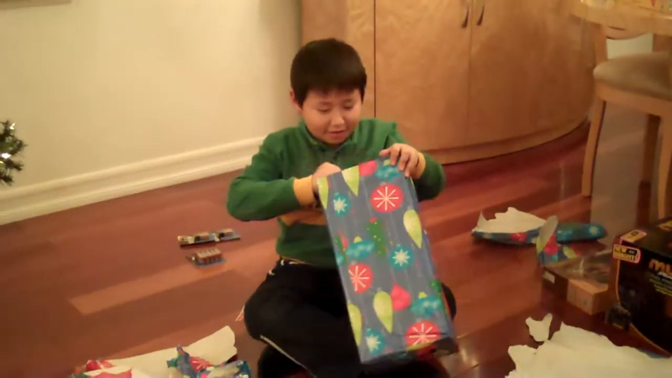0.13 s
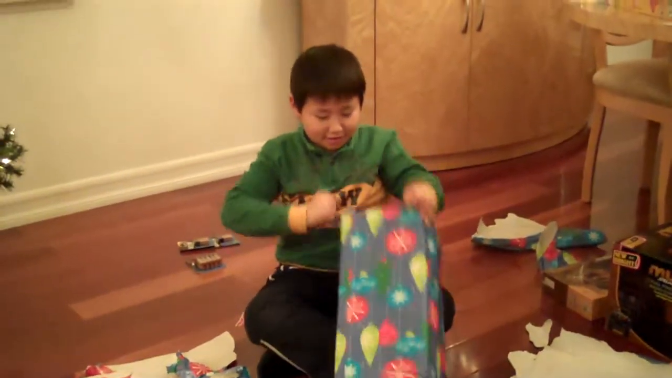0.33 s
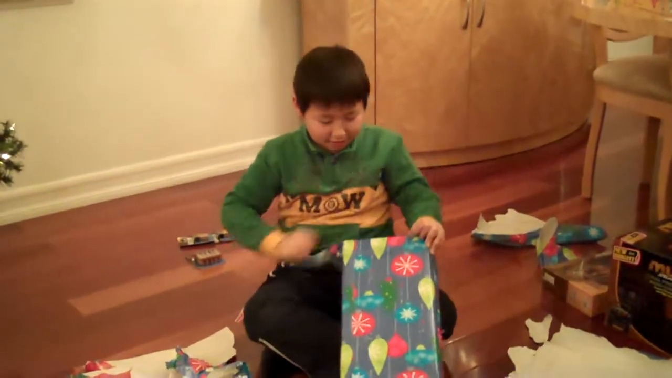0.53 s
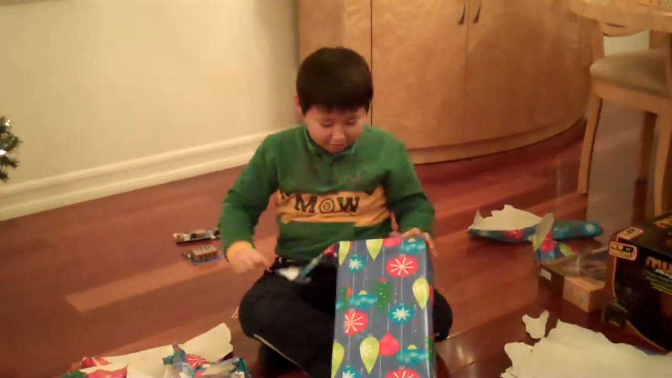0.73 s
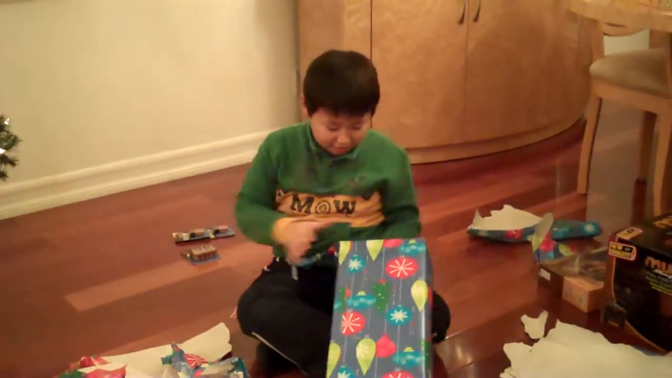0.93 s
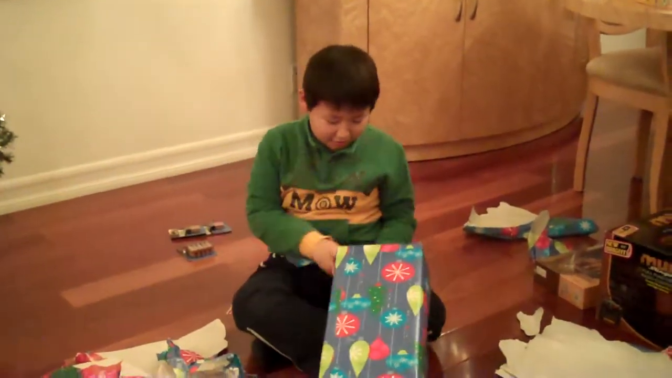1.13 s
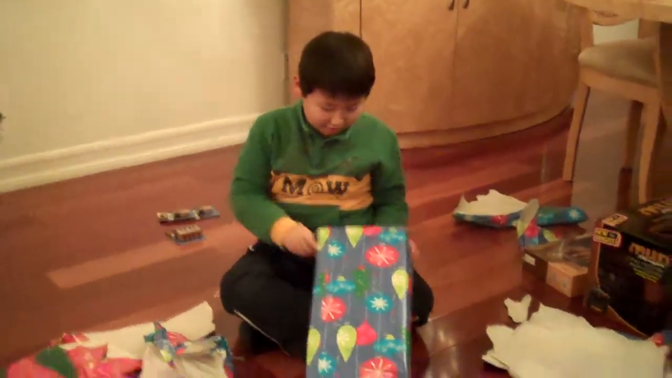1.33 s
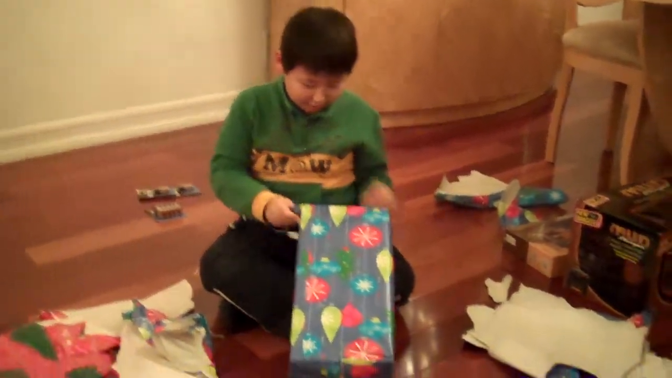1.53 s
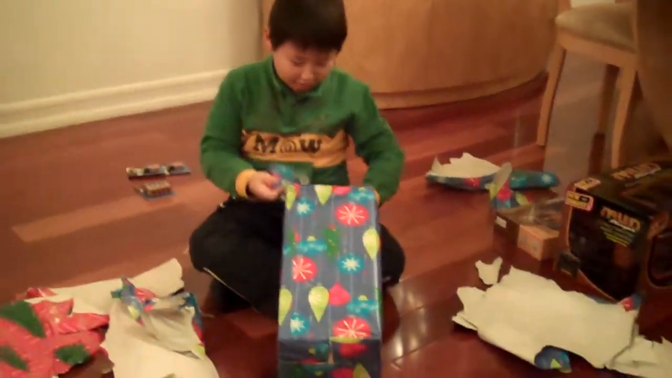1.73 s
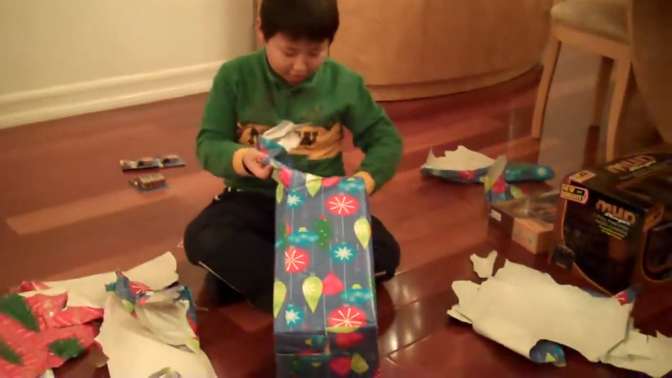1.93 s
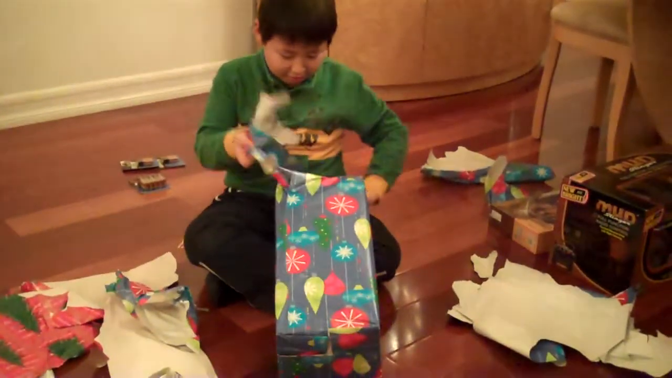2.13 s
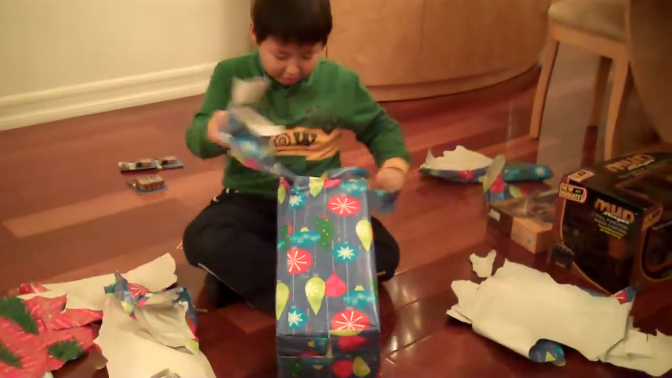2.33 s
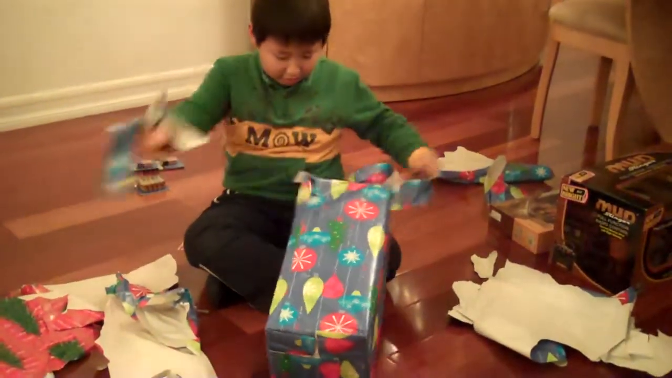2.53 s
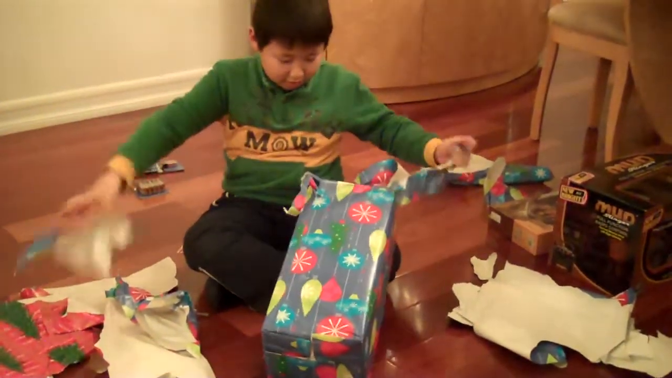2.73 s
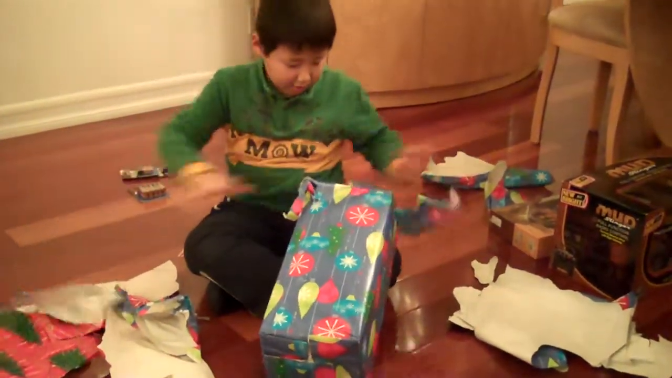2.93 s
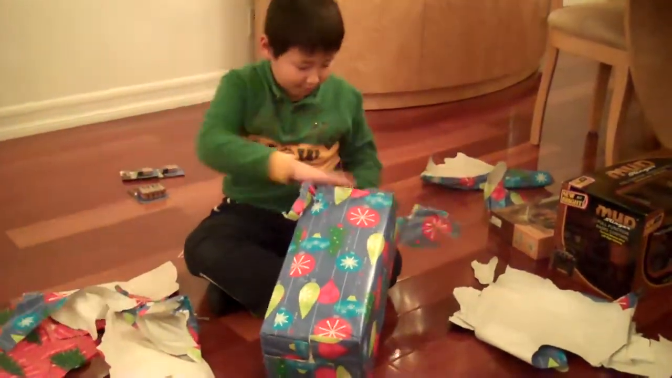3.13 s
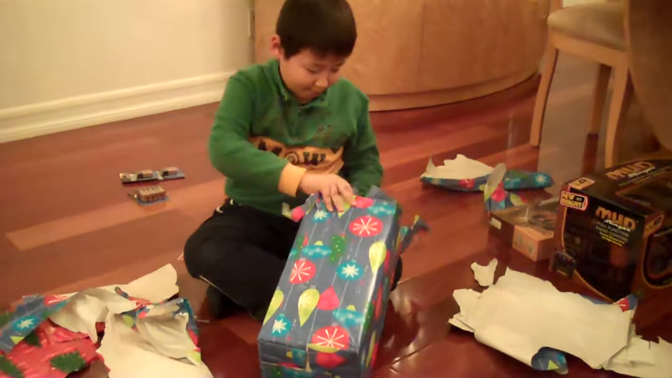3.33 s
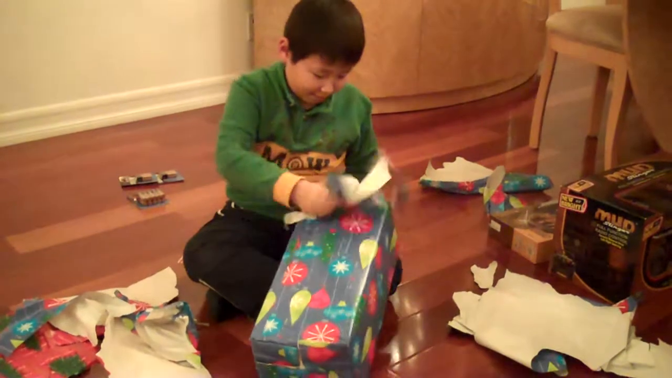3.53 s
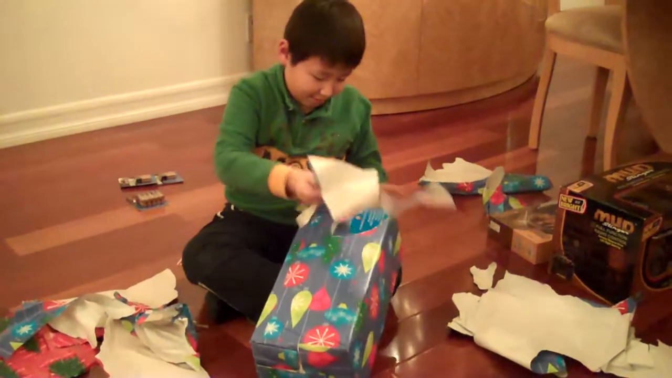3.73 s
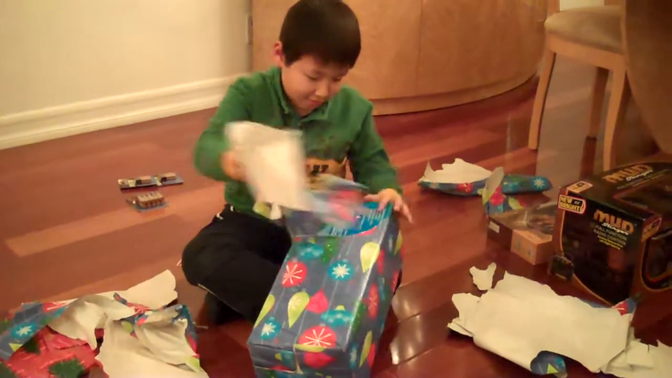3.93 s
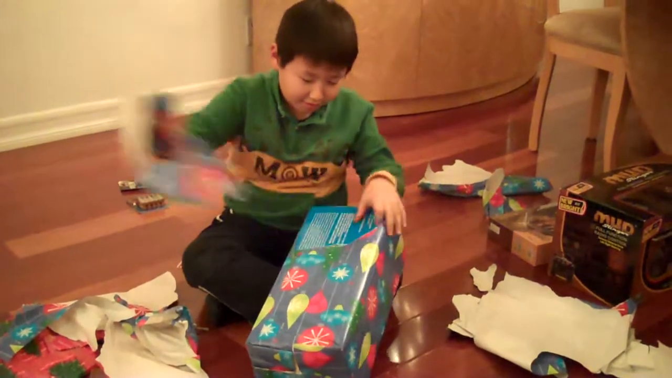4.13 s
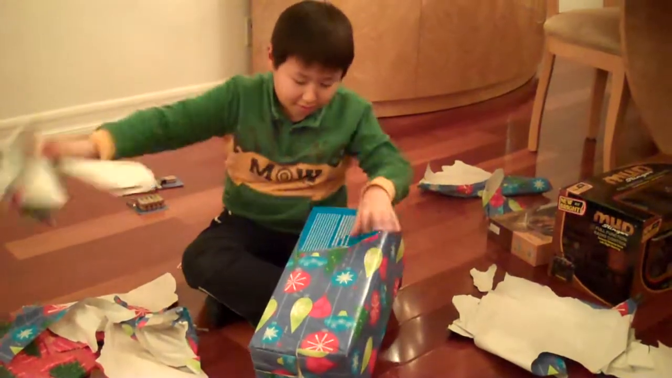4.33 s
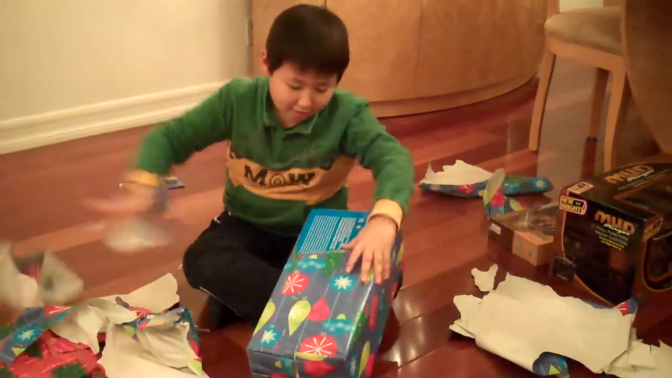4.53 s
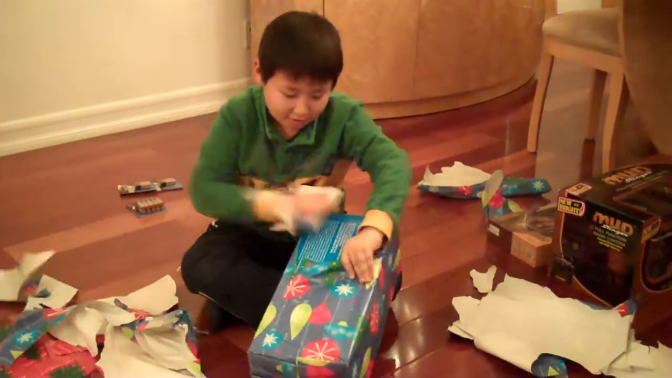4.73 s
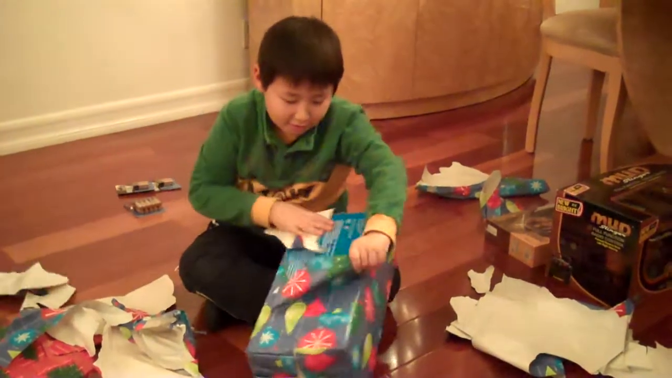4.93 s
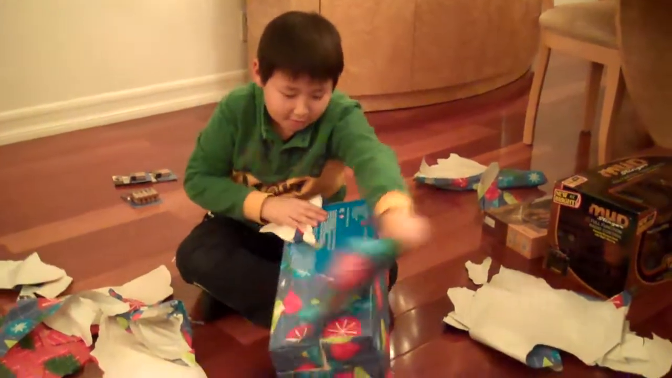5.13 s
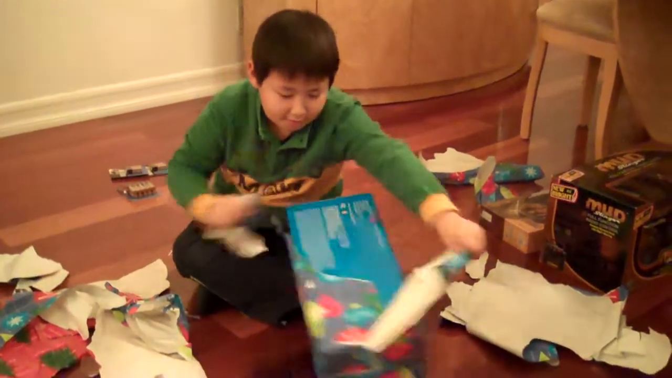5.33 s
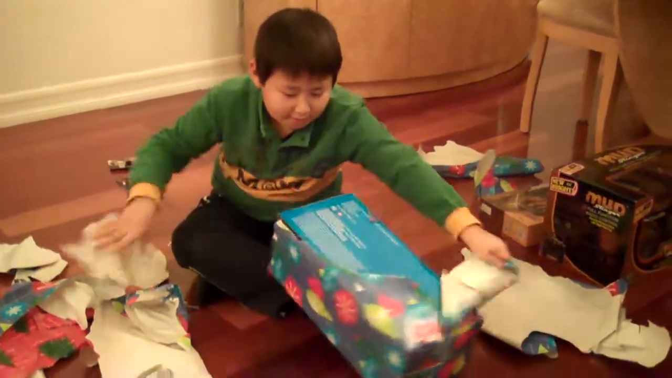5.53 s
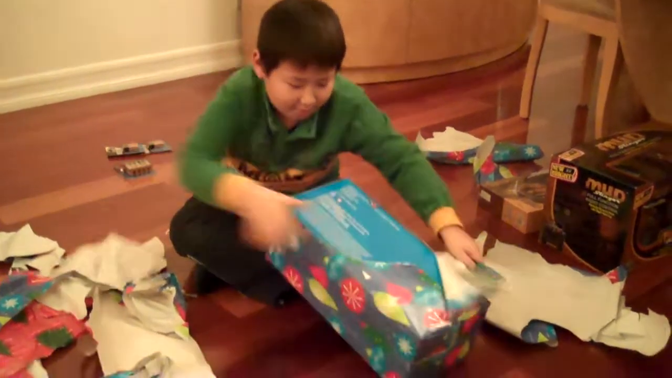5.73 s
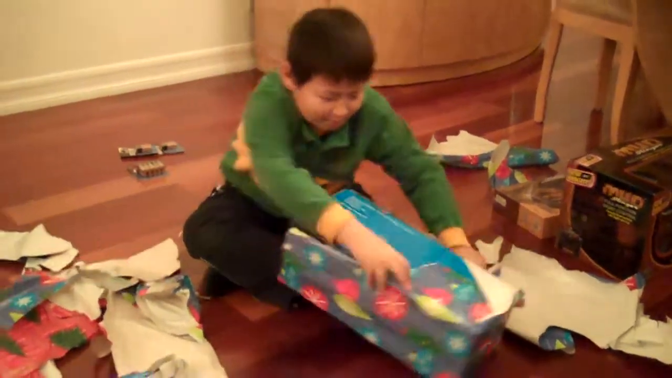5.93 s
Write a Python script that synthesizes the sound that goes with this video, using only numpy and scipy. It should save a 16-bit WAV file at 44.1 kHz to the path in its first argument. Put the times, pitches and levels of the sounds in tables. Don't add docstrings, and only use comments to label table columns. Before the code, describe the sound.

Hands tear thin gift wrap off a cardboard box in crisp, uneven rips, with sharp paper crackles and dull box knocks in a hard-floored room.

```python
import sys
import numpy as np
from scipy import signal
from scipy.fft import rfft, irfft, next_fast_len
from scipy.io import wavfile
from scipy.ndimage import uniform_filter1d, map_coordinates

SR = 44100
rng = np.random.default_rng(int(sys.argv[2]) if len(sys.argv) > 2 else 0)


def unload_wav(signal):
    wavfile.write(
        sys.argv[1],
        SR,
        np.round(np.clip(np.atleast_2d(signal).T, -1, 1) * 32767).astype(np.int16),
    )


def invert_db(level):
    return 10 ** (np.asarray(level, dtype=float) / 20)


N = 268657

# t/s, level/dB, slack (extra flap)/dB
SHEET_RUSTLE = [(0, -23.5, -2.5), (.14, -33.5, -0.5), (.5, -27, 2.5), (.86, -45.5, -9.5), (1.04, -42, -3.5),
                (1.2, -32, 5), (1.6, -26.5, -3.5), (2.2, -30.5, -0.5), (2.72, -28, 1.5), (3.06, -50, -5.5),
                (3.1, -37, 2), (3.4, -33.5, 2.5), (3.7, -20.5, 1.5), (4.03, -34, -2), (4.5, -38, 1.5),
                (4.9, -24.5, 0.5), (5.3, -34, 2), (5.84, -33.5, -1)]
# t/s, peak level/dB, struck spot f/Hz, level of the slide after it/dB
BOX_KNOCKS = [(0.308, -33, 790, -29.5), (0.458, -24.5, 220, -33), (0.607, -21, 915, -34.5),
              (1.089, -37, 980, -39), (1.721, -25, 308, -38), (1.956, -34, 960, -41),
              (2.875, -34, 250, -41.5), (3.177, -38.5, 460, -37.5), (4.574, -48, 570, -33),
              (4.8, -21.5, 180, -37), (5.406, -20.5, 300, -28.5), (5.49, -26, 450, -35),
              (5.922, -27.5, 494, -34), (5.985, -12, 800, -32)]
# f/Hz, level per Hz/dB
FIBRE_SPECTRUM = [(500, -36), (1500, -11), (2100, -1), (3300, 1.5), (5000, 4), (8000, -1), (11000, -3.5),
                  (15000, 0)]
# f/Hz, level per Hz/dB
SHEET_SPECTRUM = [(150, -30.5), (500, -9.5), (1000, -5), (2200, -3.5), (3500, -6), (7000, -24)]


def unit(x):
    return x / np.sqrt(np.mean(x ** 2) + 1e-20)


def along(points, hz):
    f, v = np.transpose(points)
    return np.interp(np.log(hz + 1), np.log(f + 1), v)


def curves(rows):
    s, *columns = np.transpose(rows)
    return [np.interp(np.arange(N) / SR, s, column) for column in columns]


def wobble(rate):
    knots = rng.standard_normal(int(N * rate / SR) + 4)
    return map_coordinates(knots, [np.arange(N) * rate / SR])


def filtered(x, response):
    size = next_fast_len(N + SR // 2)
    hz = np.fft.rfftfreq(size, 1 / SR)
    return irfft(rfft(x, size) * response(hz), size)[..., :N]


def causal(spectrum):
    def response(hz):
        cepstrum = irfft(np.log(invert_db(along(spectrum, hz))))
        half = len(cepstrum) // 2
        cepstrum[1:half] *= 2
        cepstrum[half + 1:] = 0
        return np.exp(rfft(cepstrum))
    return response


def paired(pair):
    # f/Hz, likeness (0 to 1)
    likeness = [(60, 0.088), (130, 0.84), (300, 0.97), (1400, 0.75), (3000, 0.29), (7000, 0.017),
                (14000, .05)]

    def mid_side(hz):
        angle = np.arccos(np.clip(along(likeness, hz), -1, 1)) / 2
        return np.array([np.cos(angle), np.sin(angle)])
    mid, side = filtered(pair, mid_side)
    return np.array([mid + side, mid - side])


def crackle(rate, spread_db, clump_db, channels=1):
    size_db = spread_db * np.minimum(rng.exponential(1, N), 4.5)
    size_db = size_db + clump_db * (0.83 * wobble(45) + wobble(220))
    polarity = rng.choice([-1, 1], (channels, N))
    return unit((rng.random(N) < rate / SR) * polarity * invert_db(size_db))


def air():
    # f/Hz, level per Hz/dB
    hush_spectrum = [(25, -20), (80, -3), (160, -16), (300, 0), (1200, -11.5), (4000, -1), (8000, -16),
                     (14000, -25)]
    hush = filtered(rng.standard_normal((2, N)), lambda hz: invert_db(along(hush_spectrum, hz)))
    return invert_db(-51.5 + wobble(2.3)) * unit(paired(hush))


def effort_db():
    # full force t/s, build-up/s, hold/s, tearing level/dB
    pulls = [(-0.002, 0.094, 0.094, -30), (0.44, 0.035, 0.0087, -28.5), (0.601, .08, 0.021, -18),
             (.96, .012, 0.0067, -34.5), (1.086, 0.037, 0.0084, -21), (1.243, 0.022, 0.067, -22),
             (1.388, 0.011, 0.019, -13), (1.705, 0.13, 0.14, -16.5), (1.955, 0.14, 0.062, -19),
             (2.127, 0.17, 0.036, -12.5), (2.503, 0.07, 0.047, -26.5), (2.644, 0.03, 0.017, -17.5),
             (3.172, 0.088, 0.092, -28), (3.441, 0.018, 0.046, -18), (3.49, 0.023, 0.046, -13),
             (3.626, 0.28, 0.059, -12.5), (3.785, .03, 0.071, -17.5), (3.87, 0.066, 0.04, -16.5),
             (4.576, 0.0056, 0.0072, -19), (4.644, 0.018, 0.03, -22), (4.799, 0.028, 0.063, -11.5),
             (5.031, 0.19, 0.051, -13.5), (5.142, 0.068, 0.019, -15.5), (5.272, 0.047, 0.012, -26.5),
             (5.403, 0.011, .005, -31), (5.977, .04, 0.0071, -16.5)]
    # full force t/s, build-up/s, hold/s, tearing level/dB
    rip_offs = [
        (.315, 0.19, 0.02, -13),
        (2.27, 0.13, 0.087, -16),
        (3.945, .05, 0.069, -15.5),
        (4.448, 0.0051, .012, -26.5),
        (5.878, .006, 0.026, -18),
        (3.085, .004, .01, -40),
        (5.53, 0.076, 0.014, -26),
    ]
    build_db = 26.5
    let_go_db_per_s, free_db_per_s = 272, 1200
    t = np.arange(0, N, 32) / SR
    power = invert_db(curves(SHEET_RUSTLE)[0][::32]) ** 2
    for rows, fall_db_per_s in ((pulls, let_go_db_per_s), (rip_offs, free_db_per_s)):
        for s, build, hold, db in rows:
            climb = build_db * np.maximum(s - t, 0) / build
            fall = fall_db_per_s * np.maximum(t - s - hold, 0)
            power = power + invert_db(db - climb - fall) ** 2
    return np.interp(np.arange(N) / SR, t, 10 * np.log10(power))


def shifting(x, depth_db):
    z = signal.stft(x, nperseg=256)[2]
    field = rng.standard_normal(z.shape[-2:])
    field = uniform_filter1d(field, size=7, axis=0)
    field = uniform_filter1d(field, size=16, axis=1)
    return signal.istft(z * invert_db(depth_db * unit(field)), nperseg=256)[1][..., :N]


def tearing():
    tear_db = effort_db()
    slack_db = curves(SHEET_RUSTLE)[1]
    flap_db = -9 - 0.39 * (tear_db + 31.5) + slack_db
    spiky_db = -2.5 + 0.3 * (tear_db + 25.5)
    fibres = crackle(7000, spread_db=3.0, clump_db=2.0, channels=3)
    fizz = 0.58 * paired(fibres[1:]) + 0.81 * fibres[0]
    spikes = crackle(460, spread_db=-0.5, clump_db=-3.5) * invert_db(spiky_db - 17.0)
    flap = crackle(4000, spread_db=1.5, clump_db=3.5)
    high = filtered(shifting(fizz + spikes, depth_db=1.52), causal(FIBRE_SPECTRUM))
    low = filtered(flap, causal(SHEET_SPECTRUM))
    return unit(high) * invert_db(tear_db - 6.0) + unit(low) * invert_db(tear_db + flap_db - 1.5)


def handling_db():
    slide_db_per_s = 91
    t = np.arange(N) / SR
    pull_db = uniform_filter1d(effort_db(), size=4000)
    power = invert_db(-49.5 + 0.67 * (pull_db + 30.5)) ** 2
    for s, _, _, db in BOX_KNOCKS:
        power = power + (t > s) * invert_db(db - slide_db_per_s * np.abs(t - s)) ** 2
    return 10 * np.log10(power)


def panels(hz):
    # f/Hz, width/Hz, level/dB
    modes = [
        (98, 67, -5),
        (220, 71, 3),
        (501, 188, 3),
        (970, 700, -5.5),
    ]
    total = 0
    for k, (centre, width, db) in enumerate(modes):
        mode = 1j * hz * width / (centre * centre - hz * hz + 1j * hz * width)
        total = total + (-1) ** k * invert_db(db) * mode
    return total


def box():
    rub = filtered(crackle(900, spread_db=-0.5, clump_db=-1)[0], panels)
    rub = unit(rub) * invert_db(handling_db() - 5)
    pushes, spots = np.zeros(N + SR), np.zeros(N + SR)
    t = np.arange(SR // 8) / SR
    rise = 1 - np.exp(-(t / 0.0028) ** 2)
    for s, db, hz, _ in BOX_KNOCKS:
        noise = rng.standard_normal(len(t))
        start = round(s * SR)
        push = invert_db(db + 10.5 - 60 * t / 0.054) * rise * noise
        spot = invert_db(db + 5 - 60 * t / 0.019) * rise * np.sin(2 * np.pi * hz * t)
        pushes[start:start + len(t)] += push
        spots[start:start + len(t)] += spot
    return rub + filtered(pushes[:N], panels) + spots[:N]


def grip():
    rumble = filtered(rng.standard_normal(N), lambda hz: hz / (20 + hz) / (1 + (hz / 55) ** 4))
    level_db = -62 + 0.26 * (handling_db() + 45) + 3 * wobble(4.05)
    return invert_db(level_db) * unit(rumble) * np.array([[1], [-.8]])


def creases(count=60):
    # t/s, peak level/dB, ring f/Hz, flap level re peak/dB
    rip_snaps = [(0.042, -17, 4420, -25), (0.2507, -2, 5000, -21), (0.312, -0.5, 6800, -25),
                 (1.0844, -16, 6950, -25), (1.243, -17, 6650, -25), (1.3014, -13, 6660, -25),
                 (1.3728, -8, 5060, -22), (1.3908, -0.5, 5140, -22), (1.7146, -7, 6520, -25),
                 (1.7404, -11, 6790, -25), (2.0113, -19, 6690, -25), (2.2633, -2, 4870, -27),
                 (2.3004, -6, 6610, -25), (2.3225, -10, 6700, -25), (2.361, -5.5, 7000, -19),
                 (2.5222, -10.5, 6930, -25), (2.6418, -11, 6330, -25), (3.4395, -3.5, 6910, -29),
                 (3.486, 1, 6340, -25), (3.77, -8, 6660, -29), (4.5761, -5, 5530, -25),
                 (4.6446, -7, 7040, -22), (4.653, 3, 5760, -19), (4.786, -3.5, 6790, -25),
                 (5.1445, -4, 6950, -25), (5.4051, -11.5, 6980, -25), (5.8763, -6, 5700, -23),
                 (5.89, 2, 4700, -27), (5.9787, -11, 7000, -25), (5.9833, -0.5, 6830, -30)]
    # t/s, peak level/dB, ring f/Hz, after-burst level/dB
    slack_snaps = [(0.1624, -13, 6440, -11), (0.199, -18, 5610, -12), (0.218, -13.5, 6370, -9.5),
                   (0.5536, -9, 6200, -10.5), (0.7527, -16, 6400, -9), (0.9148, -34, 4460, -12),
                   (2.794, -5, 6660, -12), (3.084, -20, 4300, -12), (3.0982, -15.5, 4580, -13),
                   (3.139, -20, 6490, -12), (3.1673, -20, 5840, -11), (3.189, -9.5, 6130, -10.5),
                   (3.2274, -3.5, 5980, -10.5), (3.245, 2.5, 4400, -12.5), (3.2602, -9, 6330, -13),
                   (3.2782, -6.5, 6400, -9.5), (3.382, -10.5, 6400, -12), (4.2767, 0.5, 3020, -9.5),
                   (4.4503, -10, 4830, -9.5), (4.5417, -18, 6300, -10), (4.5484, -12.5, 5640, -11),
                   (4.6832, -6, 5540, -11), (4.7208, -8.5, 6530, -9.5), (4.7489, 4.5, 2430, -11.5),
                   (5.4909, -12, 6500, -11), (5.5067, 0, 4360, -12), (5.6441, -5.5, 5000, -12),
                   (5.7763, -6, 4090, -12), (5.7983, -5, 2950, -11.5), (6.0028, -6, 4760, -15)]
    after_db, trim_db = -10.5, -5
    slack_flap_db, small_flap_db = -48, -52
    when = rng.random(count) * (N - 1)
    size = rng.standard_normal((count, 2))
    level_db = effort_db()[when.astype(int)] + 6.5 + 3 * size[:, 0]
    rows = [(s, db + trim_db, hz, slack_flap_db, burst_db) for s, db, hz, burst_db in slack_snaps]
    rows += [(s, db + trim_db, hz, flap_db, after_db) for s, db, hz, flap_db in rip_snaps]
    for n, db, u in zip(when, level_db, size[:, 1]):
        ring_hz = 5600 * invert_db(min(2.5 * u, 1))
        rows.append((n / SR, db, ring_hz, small_flap_db, after_db))
    return rows


def snaps():
    burst_s, facet_loss = .007, .65
    high, low, ring = np.zeros(N + SR), np.zeros(N + SR), np.zeros(N + SR)
    t = np.arange(SR // 25) / SR
    for s, db, hz, flap_db, after_db in creases():
        noise = rng.standard_normal(len(t))
        burst = invert_db(after_db) * noise * np.exp(-t / (burst_s * invert_db(after_db)))
        burst[0] = 1.16
        decay = 2 * facet_loss * hz * t
        facet = decay * np.exp(1 - decay) * np.sin(2 * np.pi * hz * t)
        start = round(s * SR)
        span = slice(start, start + len(t))
        high[span] += invert_db(db + 3.5) * (hz / 6000) ** 1.1 * burst
        ring[span] += invert_db(db - 15) * np.convolve(burst, facet)[:len(t)]
        low[span] += invert_db(db + flap_db + 18.0) * burst
    clicks = filtered(high[:N], causal(FIBRE_SPECTRUM))
    rings = filtered(ring[:N], lambda hz: (1j * hz / (1200 + 1j * hz)) ** 2)
    flaps = filtered(low[:N], causal(SHEET_SPECTRUM))
    return clicks + rings + flaps


def room(x):
    # f/Hz, T60/s
    decay_times = [(150, 0.71), (1000, 1), (4000, 0.56), (12000, 0.37)]
    # delay t/s, level/dB
    walls = [
        (.0009, -29.5),
        (.0034, -22),
        (.0068, -73),
        (.0105, -23.5),
        (.0135, -20),
        (.019, -46),
    ]
    wet, stretch = np.zeros((2, N + 2 * SR)), SR // 4
    for start in range(0, N, stretch):
        hz, t, z = signal.stft(rng.standard_normal((2, SR // 2)), SR, nperseg=256)
        decay = invert_db(-60 * t / along(decay_times, hz)[:, None])
        tail = signal.istft(z * decay, SR, nperseg=256)[1]
        tail = tail / np.linalg.norm(tail[0])
        echo = signal.fftconvolve(x[None, start:start + stretch], tail, axes=1)
        wet[:, start + 200:][:, :echo.shape[1]] += echo

    def echoes(hz, skew):
        return sum(invert_db(db) * np.exp(-2j * np.pi * hz * s * skew ** k) for k, (s, db) in enumerate(walls))
    early = filtered(x, lambda hz: np.array([echoes(hz, 1), echoes(hz, 1.012)]))
    return early + invert_db(-6.0) * paired(wet[:, :N])


def scene():
    spread, beamed = tearing() + box(), snaps()
    return spread + beamed + room(spread[0] + invert_db(-4.0) * beamed) + air()


def roll_off(x):
    return signal.sosfilt(signal.butter(12, 15540, fs=SR, output="sos"), x)


def record(dry):
    # cavity f/Hz, width/Hz, shading f/Hz
    ports = [
        (7723, 925, 90000),
        (7070, 1000, 6000),
    ]

    def port(hz):
        return np.array([c * c / (c * c - hz * hz + 1j * hz * width) / np.sqrt(1 + (hz / shade) ** 4)
                         for c, width, shade in ports])
    heard = filtered(dry, lambda hz: port(hz) * (1j * hz / (90 + 1j * hz)) ** 2)
    heard = heard + invert_db([[-64], [-76]]) * rng.standard_normal(dry.shape)
    heard = heard / (1 + np.abs(heard / 0.98) ** 8) ** (1 / 8)
    heard = filtered(heard, lambda hz: np.where(hz < 14300, 1, invert_db(-34)) * (1j * hz / (35 + 1j * hz)) ** 2)
    mix = np.clip(heard + grip(), -1, 1)
    return roll_off(mix)


dry = scene()
out = record(dry)
unload_wav(out)
```